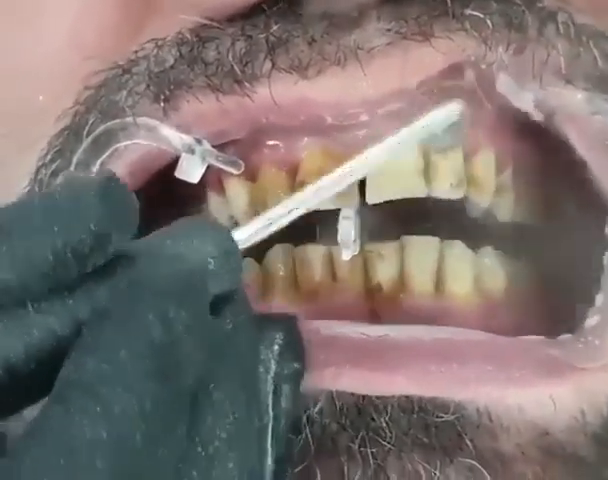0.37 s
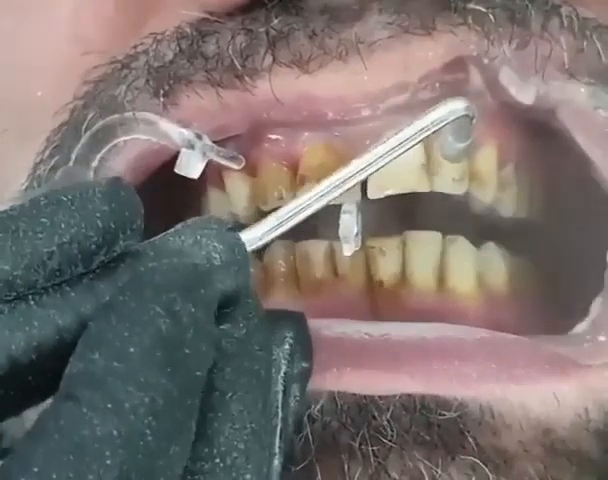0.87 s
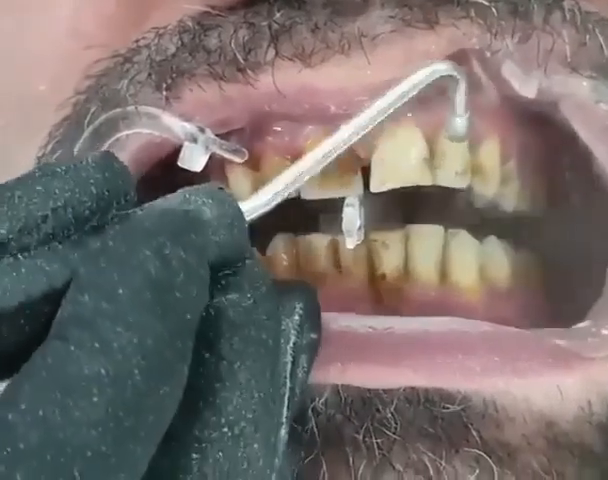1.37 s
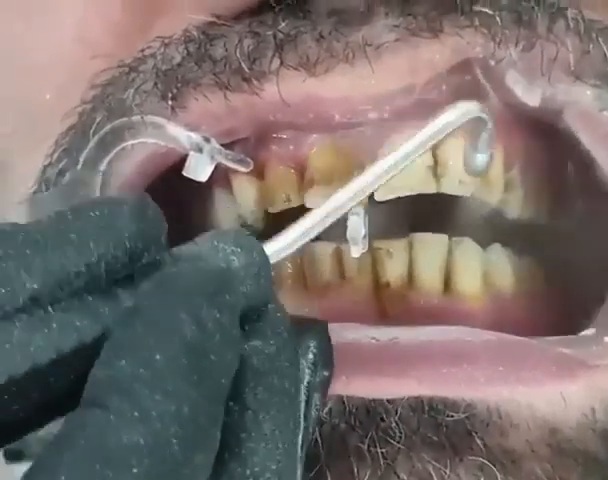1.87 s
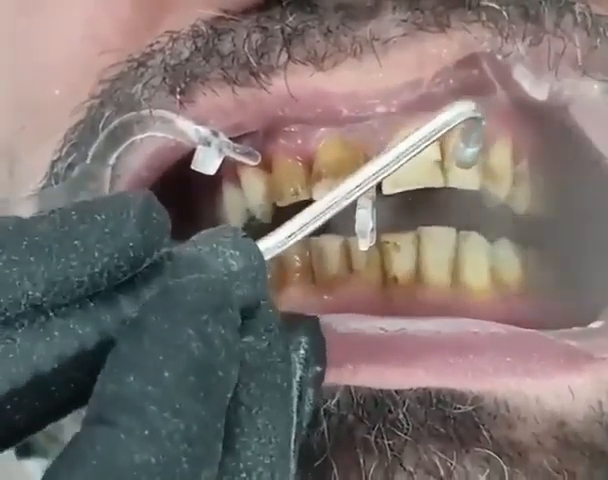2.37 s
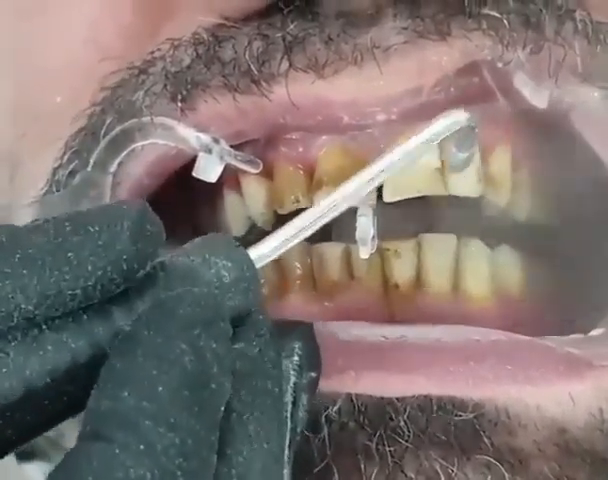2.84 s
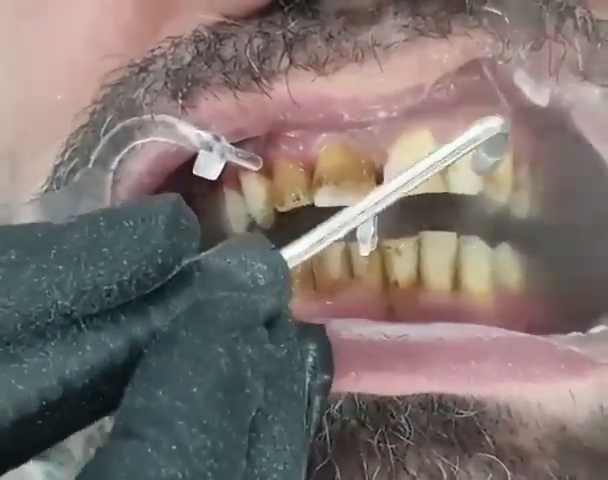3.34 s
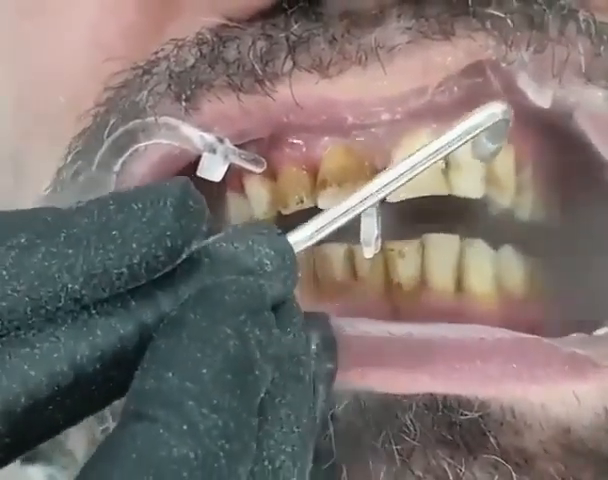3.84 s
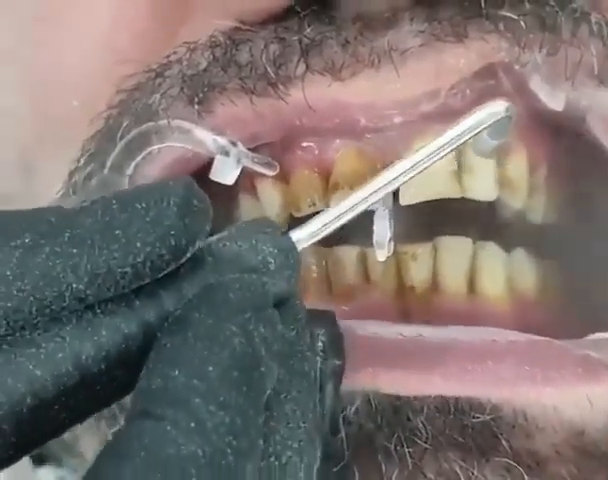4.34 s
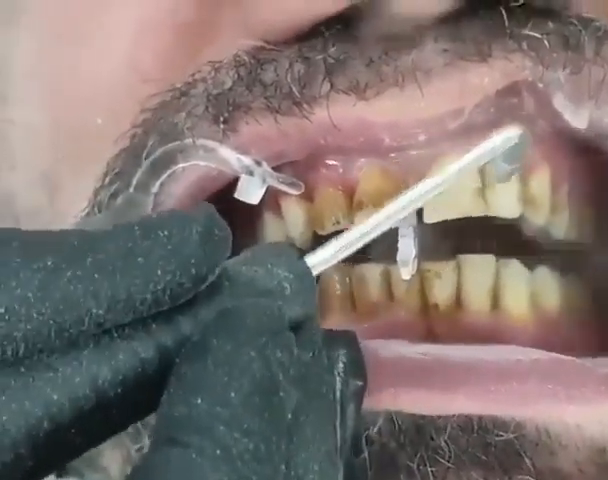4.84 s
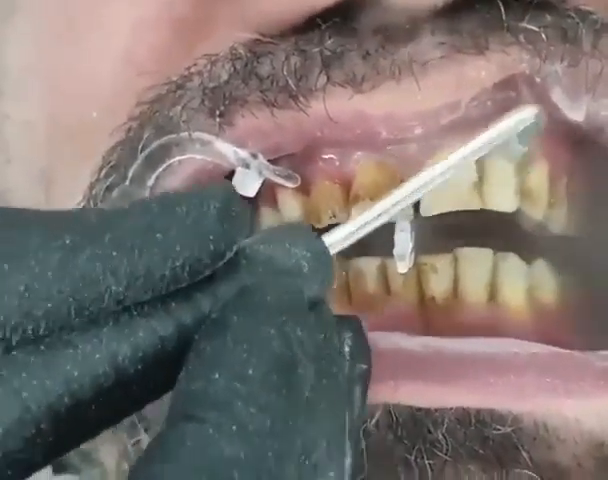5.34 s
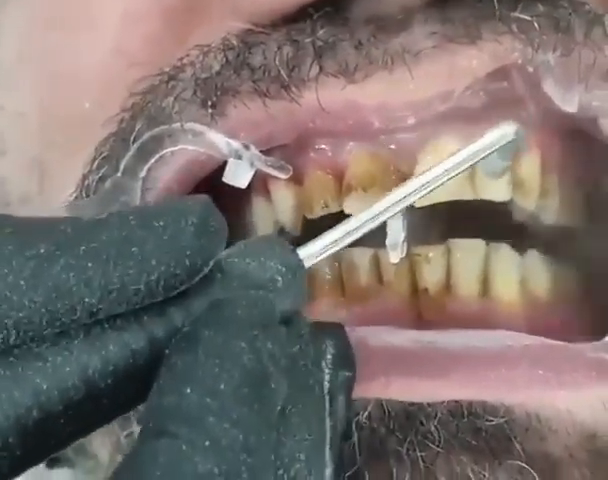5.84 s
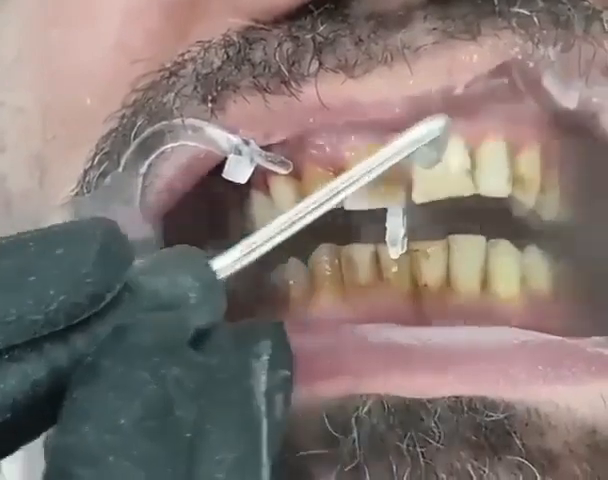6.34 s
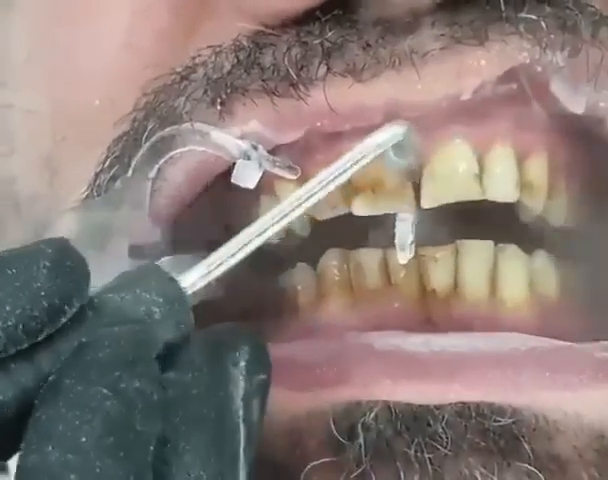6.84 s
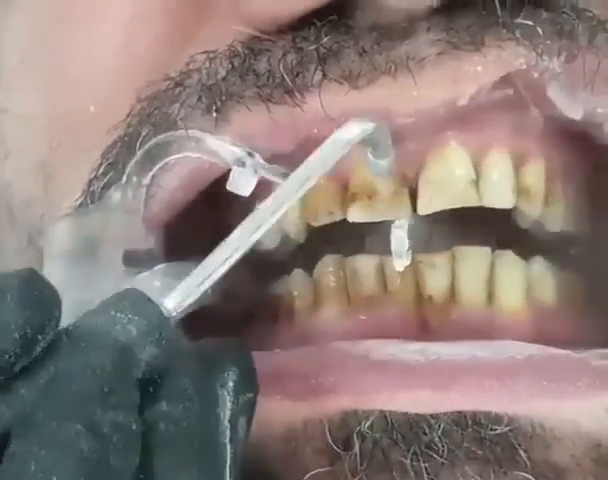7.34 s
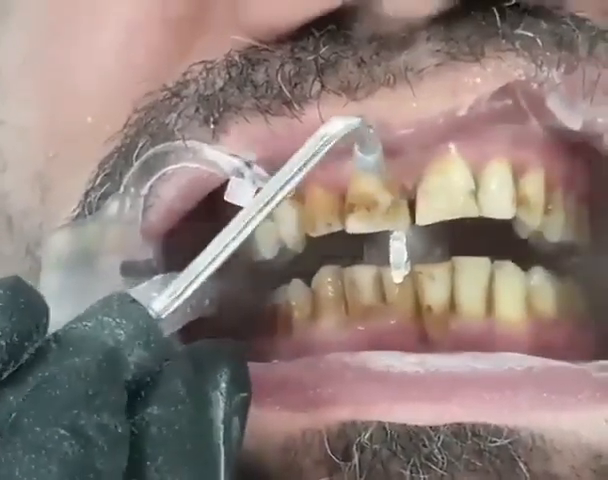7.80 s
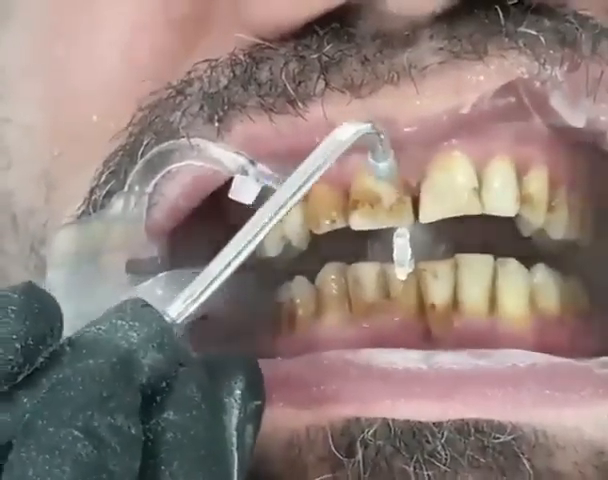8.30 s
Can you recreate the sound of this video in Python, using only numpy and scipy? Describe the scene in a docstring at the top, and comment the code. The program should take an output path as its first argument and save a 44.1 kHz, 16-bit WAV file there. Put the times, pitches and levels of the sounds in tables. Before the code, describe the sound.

A dental air polisher hisses steadily and brightly against front teeth, its wet splash ringing the open mouth over faint low suction, slightly warbly sound.

```python
"""In a dental treatment room an air polisher sprays air, water and powder onto front teeth, close to a phone.
The jet hisses in the treble and its splash rings the open mouth: both are noise shaped by resonances.
A suction tip rushes underneath as lower resonant noise, with a few soft puffs of air.
A low-rate link keeps only the stronger spectral lines, so weak bands drop out and warble."""
import sys
import numpy as np
from scipy import signal
from scipy.fft import rfft, irfft, next_fast_len
from scipy.io import wavfile
from scipy.ndimage import uniform_filter1d

SR = 44100
rng = np.random.default_rng(int(sys.argv[2]) if len(sys.argv) > 2 else 0)


def volts_from_decibels(level):
    """Turn decibel levels (scalar or array-like) into linear amplitude factors."""
    exponent = np.asarray(level, float) / 20
    return 10 ** exponent


def wav_record(signal):
    """Record a signal, one row per channel, as 16-bit PCM in the file named by sys.argv[1]."""
    frames = np.transpose(np.atleast_2d(signal))
    bounded = np.clip(frames, -1, 1)
    # unit amplitude maps onto the largest positive 16-bit level
    quanta = np.round(bounded * 32767).astype(np.int16)
    wavfile.write(sys.argv[1], SR, quanta)


N = 372201  # samples

# Every table of resonances lists f/Hz, width/Hz, level/dB relative to its fellows;
# one width away from f the amplitude is about a quarter of the peak.


def walk(rate):
    """Random modulation: levels held 1 / rate s and smoothed twice by moving averages; spread near 1."""
    hold = int(SR / rate)
    levels = np.repeat(rng.standard_normal(N // hold + 1), hold)
    slewed = uniform_filter1d(uniform_filter1d(levels, hold), hold)
    return 1.3 * slewed[:N]


def curve(table):
    """Linear interpolation: the columns of a timed table, one value per sample."""
    times, *columns = np.transpose(table)
    return [np.interp(np.arange(N) / SR, times, column) for column in columns]


def triangle(peak_s, half_s):
    """Linear envelope: rises from 0 to 1 at the peak and falls back, each in half_s."""
    return np.clip(1 - np.abs(np.arange(N) / SR - peak_s) / half_s, 0, 1)


def hiss(modes, flicker_db):
    """Resonance: turbulent noise filtered by steep modes, each with its own eddies and flicker; rms 1."""
    size = next_fast_len(N, real=True)
    f = np.arange(size // 2 + 1) * SR / size
    out = 0
    for hz, width_hz, db in modes:
        detuning = (f - hz ** 2 / (f + 1)) / (2 * width_hz)
        response = (1 + detuning ** 2) ** -2
        ring = irfft(rfft(rng.standard_normal(size)) * response, size)[:N]
        out = out + ring * volts_from_decibels(db + flicker_db * walk(12))
    return out / out.std()


def drift_db():
    """Slow amplitude modulation: every layer that calls this wanders alone."""
    return 1.09 * walk(11)


# Band levels as the nozzle moves: t/s, middle of mouth splash/dB, cheek pocket/dB, spatter/dB, whistle/dB
BAND_LEVELS = [(0.0, -4, 1.5, 1, 1.5), (0.5, -3, 0, -0.5, -0.5), (1.0, -2.5, 2, -0.5, 1.5),
               (1.4, 1, -1, -1, 2.5), (1.62, 1.6, 0.9, -0.5, 1), (1.9, 1.5, 0, -4.5, 1.5),
               (2.2, 2.5, -1, 1.5, 4.5), (2.6, 0.5, -2.5, 2.5, -1), (3.0, -2, 0, -1, -0.5),
               (3.4, 0.5, -1.5, 0, 1), (3.75, -1.5, -0.5, 1, 1), (4.4, -2, 2, -2, 1.5),
               (5.1, -2, -2, -1.5, 0), (5.8, 0, -0.5, -2.5, -1), (6.2, -1.5, -5, -2, -1),
               (6.6, 0, -0.5, 0.5, 5), (6.85, 1, -0.5, -1, 0.5), (7.15, -1.5, -2, -1.5, 3),
               (7.38, -1.5, -2.5, -1, 0.5), (7.6, -1.5, 1, -1, -1.5), (8.0, 0, 0.1, 0, 1),
               (8.1, -1.5, -9, -0.5, 2.3), (8.22, -0.1, -1.5, -0.9, 2), (8.44, 0, -2.5, -1.5, -1.5)]
# Colour as the nozzle moves: t/s, mouth ring/dB, lower hollow/dB, upper hollow/dB (positive fills it up)
SPRAY_COLOUR = [(0.0, 0.5, -10.5, -8.5), (0.3, -1.5, -1.5, -12), (0.45, 1, -14.5, 7.5), (0.7, 0, -4.5, -9),
                (1.05, -0.5, -1.5, -7.5), (1.35, -1, -7.5, -0.5), (1.65, 0.5, 0.5, -2.5),
                (1.85, 0, -4.5, -10), (2.25, -2, -5, -1), (2.55, 1, 1, -8), (2.85, -1.5, -4, -2.5),
                (3.15, 1.5, 0, -2.5), (3.45, -3, -8, 1.5), (3.7, -0.5, -0.5, 6), (3.9, -1, -4, -9.5),
                (4.15, -1.5, -4, -4), (4.4, -1, -5, -12.5), (5.1, -2, 0, -13), (5.3, -2, 0, 0),
                (5.7, 0.5, -2.5, -16), (5.95, -0.5, 4, 0.5), (6.15, -0.5, -6.5, 2.5),
                (6.3, -0.5, -1.5, 0.5), (6.5, -1.5, 0, -4), (6.6, -0.5, 5, 2), (6.7, -0.5, -7.5, -5),
                (6.85, 0, -0.5, -6), (7.05, 0.5, 1.5, 0.5), (7.35, -1.5, -6, -9.5), (7.65, -2.5, 0.5, 0),
                (8.0, 0.5, -2, -7), (8.44, 0, -1, -2.5)]


def air_polisher():
    """Superposition: the resonant layers add, then sputter together with the water feed."""
    spray_db, lean_db = spray_strength()
    middle_db, cheek_db, spatter_db, whistle_db = curve(BAND_LEVELS)
    ring_db, *depths_db = curve(SPRAY_COLOUR)
    layers = (jet_hiss(lean_db) + mouth_splash(lean_db, ring_db, middle_db) + cheek_pocket(lean_db, cheek_db)
              + spatter(lean_db, spatter_db) + nozzle_whistle(lean_db, whistle_db))
    coloured = sliding_hollows(layers, depths_db)
    sputter_db = 0.4 * walk(70) + 0.41 * walk(25)
    return coloured * volts_from_decibels(spray_db + sputter_db)


# Slow strength of the spray: t/s, level/dB, lean of the colour from mouth splash to treble/dB
SPRAY_STRENGTH = [(0.0, -28, -1.5), (0.14, -27, -0.5), (0.26, -30, -2.5), (0.36, -27.5, -1),
                  (0.75, -27, -1), (1.1, -28.5, -1), (1.62, -25.5, 0), (1.79, -28.5, -0.5),
                  (2.21, -26.5, -0.5), (2.42, -31, -2.5), (2.7, -29.5, -2), (2.96, -29, -1.5),
                  (3.3, -28.5, 0), (3.5, -27.5, -1), (3.71, -28, 0), (3.86, -27.5, -0.5),
                  (4.05, -28.5, -0.5), (4.55, -29.5, 0.5), (5.0, -27.5, 0), (5.4, -29, 0), (5.95, -27, 1),
                  (6.44, -28.5, 0.5), (6.72, -30.5, 1), (7.3, -28.5, 2), (7.7, -30.5, 0.5),
                  (8.09, -28.5, 0.5), (8.44, -28, 2.5)]
# Spurts as the jet catches an edge or a gap: peak t/s, level over the spray/dB, half length/s, lean/dB
SPURT_EVENTS = [(0.552, 1.5, 0.031, 1.5), (1.88, 2, 0.053, 0.5), (2.07, 3, 0.064, 2.5),
                (2.267, 2, 0.085, 0.5), (2.491, 7.5, 0.04, 1), (3.156, 2, 0.064, -0.5),
                (3.438, 3.5, 0.057, 0), (4.614, 4.5, 0.032, 0.5), (4.819, 2, 0.072, 2),
                (5.338, 2.5, 0.15, 0.5), (5.523, 3, 0.026, -1), (5.711, 2.5, 0.051, 1.5),
                (6.094, 1, 0.032, 1), (6.303, 2, 0.084, -0.5), (6.561, 4, 0.11, 2),
                (6.609, 3.5, 0.025, 2.5), (7.607, 2, 0.075, 2), (7.89, 3, 0.073, 1)]


def spray_strength():
    """Amplitude modulation: spurts ride on the slow level as triangles in dB and bend the colour too."""
    spray_db, lean_db = curve(SPRAY_STRENGTH)
    for peak_s, rise_db, half_s, bend_db in SPURT_EVENTS:
        swell = triangle(peak_s, half_s)
        spray_db = spray_db + rise_db * swell
        lean_db = lean_db + bend_db * swell
    return spray_db, lean_db


# Resonances of the jet: f/Hz, width/Hz, level/dB
JET_MODES = [(6734, 480, -1), (8360, 400, -0.5), (9360, 420, -15.5)]
CORE_MODES = [(7605, 330, 0)]
FLANK_MODES = [(7200, 300, 0.19), (7977, 280, -1.2)]
TOP_MODES = [(8855, 350, 0)]
LOW_NOZZLE_MODES = [(5742, 400, 0)]
# The ring is broad at first and narrows as the nozzle turns; levels over the spray:
# t/s, core/dB, flanks/dB, top/dB, low nozzle ring/dB
TREBLE_LEVELS = [(0.0, -10, -9.5, -16.5, -17.5), (0.55, -11, -8.5, -10.5, -17.5),
                 (1.0, -11, -9, -15, -16.5), (1.5, -11, -10, -13.5, -16), (1.9, -9, -15.5, -14, -14.5),
                 (2.2, -11, -9, -13, -13), (2.6, -8.5, -11.5, -15.5, -15), (3.0, -9, -10, -14.5, -16),
                 (3.5, -8.5, -9.5, -17, -13.5), (4.0, -9.5, -8.5, -15, -13), (4.5, -9, -11, -17, -16),
                 (5.0, -10.5, -9.5, -15, -16), (5.6, -8, -9, -14.5, -13.5), (6.1, -7.5, -10.5, -17, -17.5),
                 (6.55, -8.5, -14, -16.5, -16.5), (7.0, -8, -12.5, -19, -15.5),
                 (7.5, -7.5, -13.5, -15, -16), (8.0, -7, -12.5, -17, -14.5), (8.44, -7.5, -14, -14, -14)]


def jet_hiss(lean_db):
    """Jet noise: turbulence in treble resonances, louder as the colour leans up."""
    lean_gain_db = 0.45 * lean_db
    jet = volts_from_decibels(-8.5 + lean_gain_db + drift_db()) * hiss(JET_MODES, flicker_db=1.73)
    for db, modes in zip(curve(TREBLE_LEVELS), (CORE_MODES, FLANK_MODES, TOP_MODES, LOW_NOZZLE_MODES)):
        jet = jet + volts_from_decibels(db + lean_gain_db + drift_db()) * hiss(modes, flicker_db=1.5)
    return jet


# Resonances of the open mouth, its main ring and its middle: f/Hz, width/Hz, level/dB
MOUTH_MODES = [(825, 250, -17.5), (1101, 300, -7.5), (2299, 280, -0.5), (2553, 240, -6)]
RING_MODES = [(1287.6, 200, -3), (1401, 220, -3), (1357, 14, 1)]
MIDDLE_MODES = [(1604, 250, -5.5), (1916, 400, -1)]


def mouth_splash(lean_db, ring_db, middle_db):
    """Cavity resonance: splash noise rings the mouth, weaker as the colour leans to the treble."""
    def splash_db():
        powder_db = 1.62 * walk(120)  # clumps of powder roughen the splash
        return -0.9 * lean_db + powder_db + 0.9 * walk(45)

    return (volts_from_decibels(-8 + splash_db()) * hiss(MOUTH_MODES, flicker_db=0.83)
            + volts_from_decibels(-9.5 + splash_db() + ring_db) * hiss(RING_MODES, flicker_db=0.4)
            + volts_from_decibels(-8.5 + splash_db() + middle_db) * hiss(MIDDLE_MODES, flicker_db=0.93))


# Resonances of the cheek pocket: f/Hz, width/Hz, level/dB
CHEEK_MODES = [(2968, 350, -3), (3419, 330, -2), (3850, 300, -5)]


def cheek_pocket(lean_db, cheek_db):
    """Cavity resonance: noise in the cheek pocket, slightly weaker as the colour leans up."""
    return volts_from_decibels(-13.5 - 0.18 * lean_db + cheek_db + drift_db()) * hiss(CHEEK_MODES, flicker_db=1.37)


# Resonances of the spatter: f/Hz, width/Hz, level/dB
SPATTER_MODES = [(4317, 430, -4.5), (4748, 350, -5.5), (5167, 400, -1)]


def spatter(lean_db, spatter_db):
    """Resonant noise: the spatter fills the bands between mouth and jet."""
    return volts_from_decibels(-10.5 + 0.7 * lean_db + spatter_db + drift_db()) * hiss(SPATTER_MODES, flicker_db=1.34)


# Resonances of the nozzle: f/Hz, width/Hz, level/dB
NOZZLE_MODES = [(6168, 300, 0.096), (6210, 45, -1.1)]


def nozzle_whistle(lean_db, whistle_db):
    """Narrow-band resonance: a sharp peak on a broader one gives the noise a whistling pitch."""
    return volts_from_decibels(-13 + 0.84 * lean_db + whistle_db + drift_db()) * hiss(NOZZLE_MODES, flicker_db=1.36)


# Centres of two hollows that slide with the nozzle: t/s, lower f/Hz, upper f/Hz
HOLLOW_CENTRES = [(0.0, 2850, 3910), (0.8, 2860, 3820), (1.3, 2910, 3890), (1.6, 2980, 3800),
                  (1.9, 3020, 4020), (2.4, 3080, 3940), (3.0, 3010, 3900), (3.4, 2960, 3830),
                  (4.3, 3100, 3934), (5.0, 3100, 3940), (5.5, 3010, 3910), (6.1, 3070, 3850),
                  (6.6, 3040, 3780), (7.0, 3120, 3860), (7.35, 3050, 3730), (7.8, 3150, 3840),
                  (8.44, 3120, 3850)]
# Cutoff of each band's low-pass, which reaches this far to either side: lower/Hz, upper/Hz
HOLLOW_WIDTHS = [180, 140]


def sliding_hollows(x, depths_db):
    """Heterodyne filtering: shift each centre to 0 Hz, low-pass, shift back, then cut or boost that band."""
    for centre_hz, width_hz, depth_db in zip(curve(HOLLOW_CENTRES), HOLLOW_WIDTHS, depths_db):
        carrier = np.exp(2j * np.pi * np.cumsum(centre_hz) / SR)
        lowpass = signal.butter(2, width_hz, fs=SR, output="sos")
        band = 2 * (signal.sosfiltfilt(lowpass, x / carrier) * carrier).real
        x = x - (1 - volts_from_decibels(depth_db)) * band
    return x


# Resonances of the suction tip: f/Hz, width/Hz, level/dB
UPPER_SUCTION = [(817.4, 300, 0)]
MIDDLE_SUCTION = [(596.3, 220, 0)]
LOWEST_SUCTION = [(260.6, 56, -14.5), (408, 170, 4)]
# Levels of the rush: t/s, upper/dB, middle/dB, lowest/dB
RUSH_LEVELS = [(0.0, -54, -55.5, -52.5), (0.62, -48, -52.5, -51), (0.72, -47, -59, -65),
               (0.82, -49.5, -54, -51.5), (1.05, -55, -53, -51), (1.4, -53, -54.5, -54.5),
               (1.65, -53.5, -49, -54), (2.1, -54.5, -56, -55.5), (2.22, -55, -56.5, -63),
               (2.35, -54, -54, -53), (3.0, -51, -52.5, -54), (3.07, -55, -58, -63),
               (3.15, -55, -53.5, -50.5), (3.45, -59.5, -53.5, -66), (3.7, -52.5, -53, -50),
               (4.4, -52, -56.5, -55), (4.8, -55.5, -54.5, -56.5), (5.0, -52.5, -59, -53),
               (5.17, -58.5, -55.5, -53.5), (5.23, -57, -60, -62), (5.29, -56, -55, -52.5),
               (5.5, -53.5, -56, -52), (5.9, -53, -52.5, -52.5), (6.01, -50, -57, -61),
               (6.15, -51.5, -54, -52.5), (6.42, -52.5, -54, -54), (6.57, -52, -45, -45),
               (6.7, -55, -65, -57), (6.8, -52, -56.5, -52.5), (6.92, -58, -55.5, -66),
               (7.12, -57, -56.5, -71), (7.3, -60, -55, -72), (7.4, -59.5, -71, -75), (7.62, -57, -71, -70),
               (7.7, -64, -68, -57), (7.88, -58, -68.5, -58), (7.97, -61.5, -48.5, -51),
               (8.06, -60, -71, -69), (8.35, -57, -71.5, -70), (8.44, -58.5, -66, -57)]


def suction_tip():
    """Flow noise: turbulence in three low resonant bands whose levels move separately."""
    upper_db, middle_db, lowest_db = curve(RUSH_LEVELS)
    return (volts_from_decibels(upper_db) * hiss(UPPER_SUCTION, flicker_db=0.74)
            + volts_from_decibels(middle_db) * hiss(MIDDLE_SUCTION, flicker_db=0.52)
            + volts_from_decibels(lowest_db) * hiss(LOWEST_SUCTION, flicker_db=0.9))


# Resonance of the puffs: f/Hz, width/Hz, level/dB
PUFF_MODES = [(267.7, 60, 0)]
# Low puffs of air: peak t/s, level/dB, half length/s
PUFF_EVENTS = [(0.25, -62, .04), (2.798, -56, .04), (3.16, -58.5, .04), (3.608, -51.5, 0.036),
               (5.896, -59, 0.042), (6.3, -57, .04), (6.557, -51, 0.043), (7.863, -60, .03)]


def air_puffs():
    """Gated turbulence: low resonant noise under short triangular envelopes."""
    envelope = sum(volts_from_decibels(db) * triangle(peak_s, half_s) for peak_s, db, half_s in PUFF_EVENTS)
    return hiss(PUFF_MODES, flicker_db=-0.5) * envelope


def scene():
    """Superposition: polisher, suction and puffs add independently, alike in both channels."""
    return np.tile(air_polisher() + suction_tip() + air_puffs(), (2, 1))


# Rounding step of the link against the rms of the moment's spectral lines: f/Hz, level/dB
LINK_STEP = [(250, -2), (400, -2), (800, 0), (1600, 5), (2400, 5), (2900, 2), (3500, 1.5), (5000, 4.5),
             (7500, 6.3), (8900, 4.3), (9150, -1), (9800, -8)]


def thin_link(x, scatter_db, dead_zone):
    """Transform quantisation: lines of overlapping 43 ms frames take coarse steps, so weak ones vanish."""
    hop, line_count = 940, 416  # samples, spectral lines
    n, k = np.arange(2 * hop) + 0.5, np.arange(line_count) + 0.5
    line_hz = k * SR / 2 / hop
    window = signal.windows.kaiser_bessel_derived(2 * hop, 4 * np.pi)
    cosines = np.cos(np.pi / hop * np.outer(n + hop / 2, k)) * np.sqrt(2 / hop)
    basis = window[:, None] * cosines
    count = N // hop + 3
    padded = np.pad(x, (hop, count * hop - N))
    lines = padded[np.arange(count)[:, None] * hop + np.arange(2 * hop)] @ basis
    table_hz, table_db = np.transpose(LINK_STEP)
    step_db = np.interp(np.log(line_hz), np.log(table_hz), table_db)
    # groups of 16 lines share a step that changes from frame to frame
    chance = np.repeat(rng.standard_normal((count, line_count // 16)), 16, axis=1)
    frame_rms = np.sqrt(np.mean(lines ** 2, axis=1, keepdims=True))
    step = frame_rms * volts_from_decibels(step_db + scatter_db * chance)
    # the highest line sent jumps every other frame
    top_hz = 9380 + 270 * np.repeat(rng.standard_normal(count), 2)[:count, None]
    lines = lines * (line_hz < top_hz)
    rounded = np.sign(lines) * np.floor(np.abs(lines) / step + 1 - dead_zone) * step
    frames = rounded @ basis.T
    return (frames[1:, :hop] + frames[:-1, hop:]).ravel()[:N]  # overlap-add


def band_limit(x):
    """A steep low-pass at the top of the band."""
    return signal.sosfilt(signal.butter(12, 10220, fs=SR, output="sos"), x)


def record(dry):
    """High-pass filtering: one microphone without bass, then a thin link, alike in both channels."""
    microphone = signal.butter(4, 230, "high", fs=SR, output="sos")  # Hz
    heard = signal.sosfilt(microphone, dry[0])
    sent = thin_link(heard, scatter_db=2.0, dead_zone=0.62)
    mix = np.tile(sent, (2, 1))
    return band_limit(mix)


dry = scene()
out = record(dry)
wav_record(out)
```